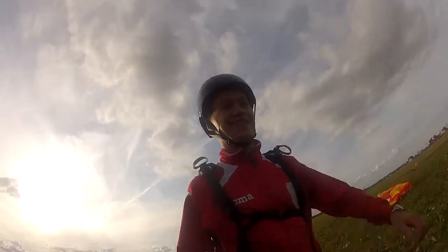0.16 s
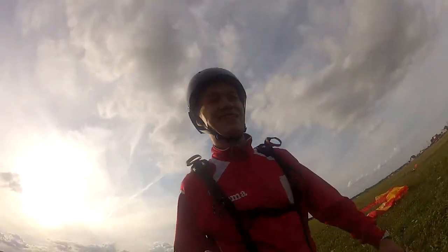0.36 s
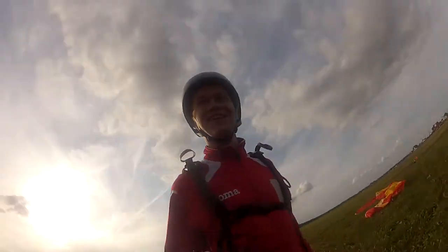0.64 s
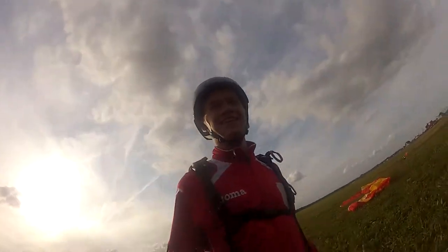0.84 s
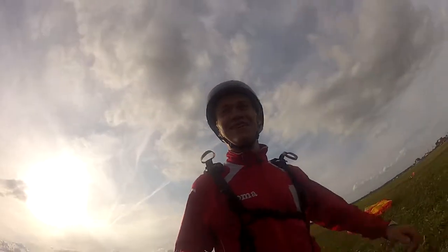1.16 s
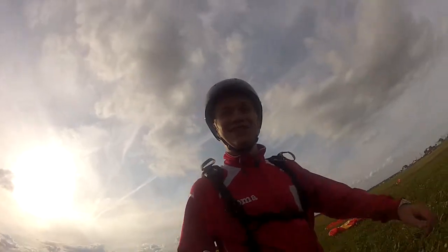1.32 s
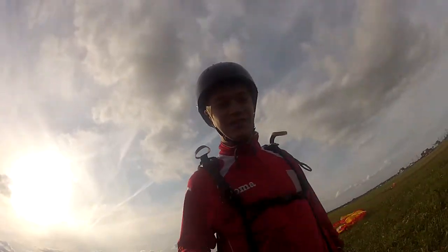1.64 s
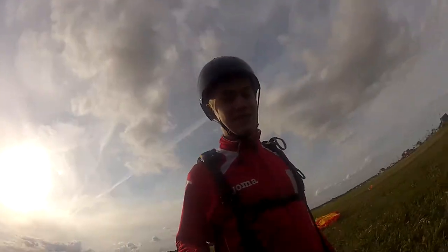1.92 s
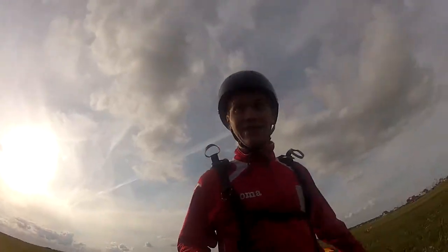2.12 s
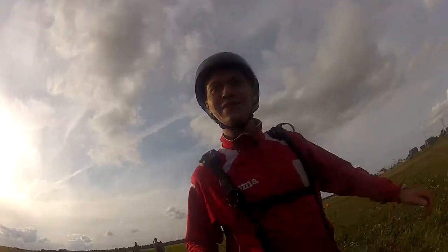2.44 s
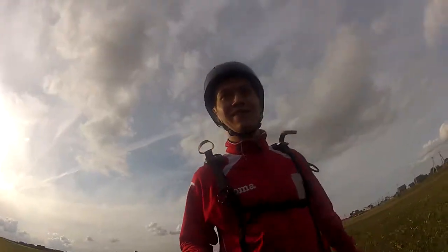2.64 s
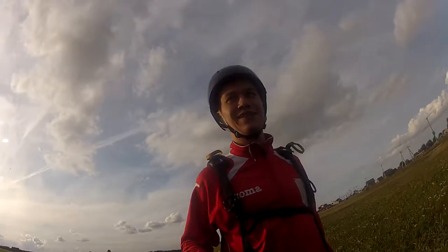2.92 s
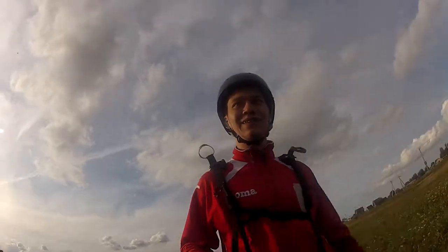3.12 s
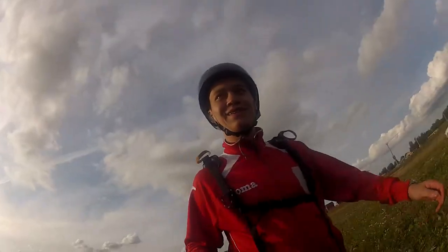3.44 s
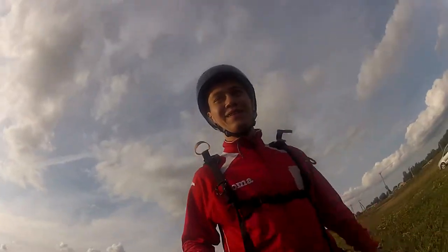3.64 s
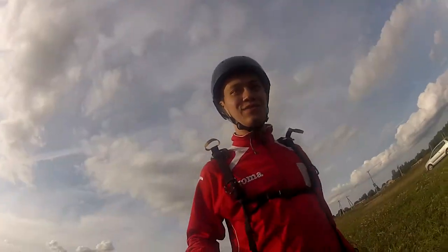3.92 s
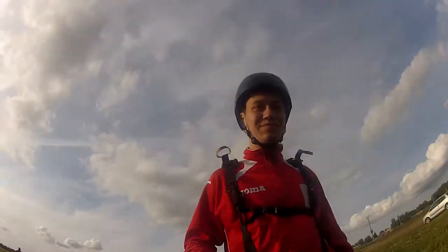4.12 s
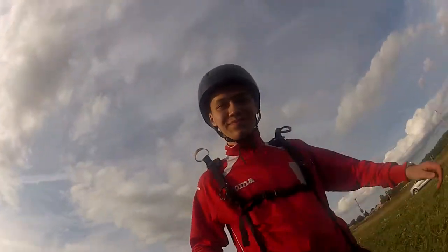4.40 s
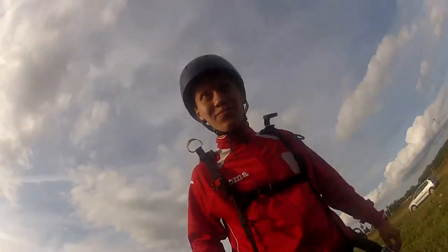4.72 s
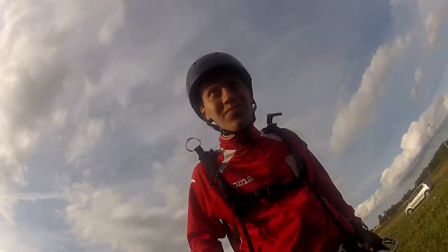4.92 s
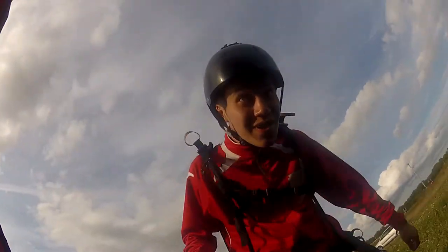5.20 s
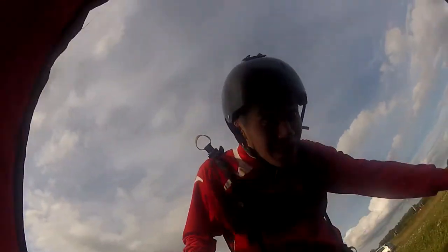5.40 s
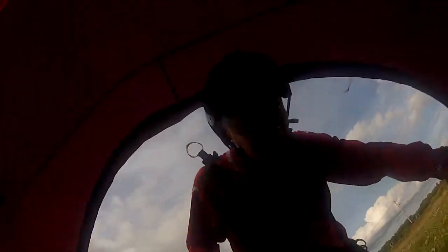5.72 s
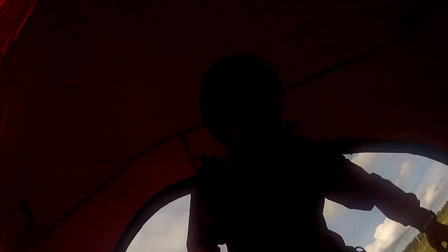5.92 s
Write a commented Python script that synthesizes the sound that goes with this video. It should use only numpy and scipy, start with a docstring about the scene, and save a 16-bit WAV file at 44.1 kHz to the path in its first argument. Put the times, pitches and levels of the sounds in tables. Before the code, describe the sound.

A nylon jacket rustles right at the microphone, with short strap tugs and a buckle tick at about 0.2 seconds. From 0.5 seconds, dull footsteps on grass thud evenly, about twice a second. They are the loudest sound, each jolting the carried camera with a low knock and a brief shudder. Between steps a sleeve swishes softly along the jacket, harness buckles tick, and the gear makes small dull bumps and scuffs. The camera mount gives a short hollow rattle at about 3.7 seconds and again at 4.7, followed by a quick cluster of sharper buckle clicks near 4.9. The last two steps, around 5.3 and 6 seconds, are much softer, while the cloth keeps swishing. A faint low rumble of air on the microphone runs underneath throughout. Everything sounds close and dry, as in an open field.

```python
"""Nylon rustles right at the microphone, then dull footfalls thud about twice a second.
A walker in a jacket and harness crosses an open grass field, carrying a small camera.
Each footfall jolts the camera: a thud and a short shudder, twice with a hollow rattle of the mount.
Between steps the cloth swishes, buckles tick and a little air rumbles on the microphone."""
import sys
import numpy as np
from scipy import signal
from scipy.fft import rfft, irfft
from scipy.io import wavfile

SR = 44100
rng = np.random.default_rng(int(sys.argv[2]) if len(sys.argv) > 2 else 0)


def waveform_to_disk(signal):
    """Save audio, clipped to [-1, 1], as 16-bit WAV at the path in sys.argv[1]."""
    frames = np.transpose(np.atleast_2d(signal))
    scaled = np.clip(frames, -1, 1) * 32767
    samples = np.round(scaled).astype(np.int16)
    wavfile.write(sys.argv[1], SR, samples)


N = 266981


def amp(db):
    """Decibels to gain."""
    return 10 ** (np.asarray(db) / 20)


def unit(x):
    """Scales to rms 1."""
    return x / np.sqrt(np.mean(x ** 2) + 1e-20)


def curve(rows):
    """A curve through (time_s, value) rows, at every sample."""
    return np.interp(np.arange(N) / SR, *np.transpose(rows))


def add(mix, start_s, sound):
    """Mixes a sound in at start_s."""
    part = mix[max(round(start_s * SR), 0):][:len(sound)]
    part += sound[:len(part)]


def colour(x, spectrum):
    """Filters x through (freq_hz, level_db) points and scales it to rms 1."""
    hz, db = np.transpose(spectrum)
    freqs = np.fft.rfftfreq(len(x), 1 / SR)
    gain = amp(np.interp(np.log(freqs + 1), np.log(hz), db))
    return unit(irfft(rfft(x) * gain, len(x)))


def noise(spectrum, size=N):
    """Noise with a given spectrum, at rms 1."""
    return colour(rng.standard_normal(size), spectrum)


def wander(rate_hz):
    """Random drift at rms 1, up to about rate_hz changes a second."""
    freqs = np.fft.rfftfreq(N, 1 / SR)
    return unit(irfft(rfft(rng.standard_normal(N)) / (1 + (freqs / rate_hz) ** 4), N))


def swing(t, hz, peak_s, sharp):
    """A heavily damped swing that builds until peak_s and dies within a few cycles."""
    age = np.maximum(t, 0) / peak_s
    return (age * np.exp(1 - age)) ** sharp * np.sin(2 * np.pi * hz * t)


def stroke(start_s, length_s, slope_db=0, rise_s=0.01, fall_s=0.019, arch_db=2):
    """Power of one rubbing stroke: it catches quickly, holds in a sloping arch and lets go."""
    t = np.arange(N) / SR - start_s
    from_middle = np.clip(t / length_s, 0, 1) - .5
    gate = np.clip(t / rise_s, 0, 1) * np.exp(-np.maximum(t - length_s, 0) / fall_s)
    return (gate * amp(slope_db * from_middle - arch_db * (2 * from_middle) ** 2)) ** 2


# Footfalls, felt through the camera body; the later levels are relative to the thud:
# start_s, level_db, pitch_hz, weight_db, knock_db, rebound_delay_s, rebound_db, shudder_db, grit_db
FOOTFALLS = [(0.4974, -7, 198.6, -5.5, 4.5, 0.0059, -10, -22, -20),
             (1.0207, -9.5, 199.4, -5.5, -12, 0.0044, -2.5, -23.5, -25),
             (1.5731, -10.5, 208, -1, -15, 0.0057, -8, -16, -20),
             (2.1109, -6.5, 199.6, -8, -1, 0.0096, -4.5, -22, -29),
             (2.6220, -6, 214, -3, -1.5, 0.008, -15, -22, -25.5),
             (3.137, -8.5, 193, -5, -2.5, 0.0059, -9.5, -19.5, -23.5),
             (3.6563, -10, 198, -0.5, 3.5, 0.00925, -13, -17, -24),
             (4.21, -9, 195, -5.5, 1, 0.0105, -10, -19.5, -25.5),
             (4.7315, -12.5, 187.6, -1.5, -7.5, 0.007, -14, -19, -20),
             (5.2770, -28, 171, 1, 2.5, 0.016, 0.5, -5.5, -15),
             (5.953, -31, 193, 3.5, -3, 0.0069, -5, -11, -30)]
# Dull shudder of the carried gear: freq_hz, level_db
SHUDDER_SPECTRUM = [(40, -8), (120, 0), (230, 1.5), (400, -1.5), (600, -0.5), (760, -13.5), (950, -34.5),
                    (2000, -30.5), (4000, -80)]
# Grit underfoot, down in the grass: freq_hz, level_db
GRIT_SPECTRUM = [(300, 9), (650, 3), (900, -10), (1300, -3), (1900, -6), (3000, -5.5), (8000, -19),
                 (15000, -19)]
# Soft bumps of the gear, close by, after and between steps: start_s, level_db, pitch_hz
GEAR_BUMPS = [(.012, -32, 243), (1.06, -29, 543), (1.087, -25, 298), (1.102, -27.5, 574),
              (1.5734, -22, 540), (1.589, -23.5, 526), (2.123, -20.5, 510), (2.167, -28, 293),
              (2.648, -28, 335), (3.146, -16.5, 480), (3.205, -33, 378), (3.527, -31.5, 450),
              (4.221, -33, 460), (5.272, -22, 406), (5.350, -33, 388)]
def footfalls():
    """The heel's jolt swings the camera; the mount knocks at the turn, rebounds and shudders."""
    out, t = np.zeros(N), np.arange(SR // 3) / SR
    for start_s, db, hz, weight_db, knock_db, delay_s, rebound_db, shudder_db, grit_db in FOOTFALLS:
        heel = amp(weight_db - 11.5) * swing(t, hz=101.4, peak_s=0.002, sharp=0.3)
        weight = amp(weight_db) * swing(t, hz=142.6, peak_s=0.0036, sharp=1.32)
        thud = swing(t, hz, peak_s=0.0056, sharp=4.54)
        knock = amp(knock_db) * swing(t - .0029, hz=405.6, peak_s=0.0023, sharp=4.96)
        rebound = amp(rebound_db) * swing(t - delay_s, hz=337, peak_s=0.0023, sharp=2.1)
        shudder_envelope = amp(shudder_db - 60 * t / 0.21) * np.minimum(t / 0.0035, 1)
        shudder = shudder_envelope * noise(SHUDDER_SPECTRUM, len(t))
        grit = amp(grit_db - 60 * t / 0.03) * noise(GRIT_SPECTRUM, len(t))
        add(out, start_s, amp(db) * (heel + weight + thud + knock + rebound + shudder + grit))
    for start_s, db, hz in GEAR_BUMPS:
        add(out, start_s, amp(db) * swing(t, hz, peak_s=0.0032, sharp=6.1))
    return out


# The mount rattling, right at the microphone: start_s, level_db, chatter_s, rasp_db (relative)
MOUNT_RATTLES = [(3.711, -23, 0.0074, -14), (4.744, -24.5, 0.028, -12)]
# Hollow modes of the mount, lowest first: pitch_hz, level_db, t60_s
MOUNT_MODES = [(601, -0.5, 0.058), (663, -11, 0.15), (950, -3, 0.017), (1160, -17, 0.049),
               (1390, -7, 0.022), (1630, -8, 0.014), (1870, -23, 0.013), (2900, -21, 0.017),
               (3570, -33, .02)]
def mount_rattles():
    """The loose mount chatters once a cycle of its lowest mode, rasps while it touches and rings on."""
    out, t = np.zeros(N), np.arange(SR // 5) / SR
    lowest_hz = MOUNT_MODES[0][0]
    impacts = np.diff(np.floor(t * lowest_hz), prepend=-1)
    ring = sum(amp(db - 60 * t / t60_s) * np.sin(2 * np.pi * hz * t) for hz, db, t60_s in MOUNT_MODES)
    for start_s, db, chatter_s, rasp_db in MOUNT_RATTLES:
        contact = np.exp(-(t / chatter_s) ** 2)
        drive = contact * (impacts + 0.12 * rng.standard_normal(len(t)))
        chatter = signal.fftconvolve(drive, ring)[:len(t)]
        add(out, start_s, amp(db) * (chatter / abs(chatter).max() + amp(rasp_db) * rasp(contact)))
    return out


# Rasp of the mount's touching parts: freq_hz, level_db
RASP_SPECTRUM = [(400, 4), (800, 5.5), (1200, -0.5), (1500, -23), (2000, 0), (2600, -11), (3600, -11),
                 (6000, -44), (10000, -13), (14000, -24)]
def rasp(contact):
    """Rough noise that lasts as long as the parts touch."""
    return contact * noise(RASP_SPECTRUM, len(contact))


# Resting rustle of the jacket, within arm's reach: time_s, level_db
JACKET_REST = [(0, -49.5), (1.6, -53.5), (2.3, -56.5), (3.6, -59), (4.8, -56), (5.4, -57), (6.05, -58.5)]
# The sleeve sweeping along the jacket, once a step: start_s, length_s, level_db, slope_db
SLEEVE_SWISHES = [(0.149, 0.26, -48.5, -11), (0.556, 0.23, -51, -8), (1.212, .24, -46, -3),
                  (1.696, 0.22, -45.5, -0.5), (2.265, .195, -49.5, -2.5), (2.676, .19, -55.5, 5),
                  (3.292, 0.23, -55, -18), (3.881, 0.11, -46.5, 7), (4.27, 0.317, -52, 2.5),
                  (4.926, .215, -49.5, -16), (5.453, .30, -49.5, -6.5)]
# Abrupt tugs of the harness on the cloth: start_s, length_s, level_db, strap_share (0-1)
HARNESS_TUGS = [(0.029, 0.0099, -37.5, .5), (0.073, 0.028, -39.5, 1), (0.22, 0.023, -39.5, 0.54),
                (0.611, 0.014, -39, 0.5), (0.654, 0.024, -45, 0.2), (1.279, 0.037, -44.5, 0),
                (1.611, 0.013, -44.5, 0.07), (2.047, 0.05, -45.5, 0.67), (2.3, 0.034, -45.5, 0),
                (3.771, 0.064, -51.5, 0.34), (4.289, 0.042, -49.5, .4), (5.439, 0.022, -53, 0.04),
                (5.586, 0.053, -46.5, .05)]
def rubbing(shake_db=-0.5, usual_strap_share=0.1):
    """Arm swings, step shakes and tugs rub the cloth; gives the level in dB and the strap's share."""
    shakes = sum(stroke(step_s - 0.048, length_s=0.11, slope_db=1) for step_s, *_ in FOOTFALLS)
    power = amp(curve(JACKET_REST)) ** 2 * (1 + amp(shake_db) ** 2 * shakes)
    for start_s, length_s, db, slope_db in SLEEVE_SWISHES:
        power += amp(db) ** 2 * stroke(start_s, length_s, slope_db)
    strap_power = usual_strap_share * power
    for start_s, length_s, db, strap_share in HARNESS_TUGS:
        tug = amp(db) ** 2 * stroke(start_s, length_s, rise_s=0.006, fall_s=0.006)
        power += tug
        strap_power += strap_share * tug
    return 10 * np.log10(power), np.clip(strap_power / power, 0, 1)


# Nylon sliding on nylon, heard close up: freq_hz, level_db
NYLON_SPECTRUM = [(530, -28), (900, -13), (1120, -11), (1200, -7.5), (1480, -12.5), (1800, -8.5),
                  (1950, -7.5), (2930, 1.5), (5060, -8.5), (5980, -11), (6730, -12.5), (8750, -7.5),
                  (11900, -36.5), (14600, -19), (15500, -10)]
# A strap drawn over the cloth: freq_hz, level_db
STRAP_SPECTRUM = [(900, -29), (2000, -11.5), (2900, -6), (3900, -6), (4900, 5.5), (5900, -9.5), (7100, 3.5),
                  (8000, -20), (8800, -9), (11000, -31), (15000, -17)]
def jacket(rub_db, strap_share, snaps_per_s=95, snap_db=5, snap_s=0.00076,
           flutter_db=1.15, folds_db=1.2, tilt_db=1.83):
    """Nylon slides on nylon or under a strap: a fine hiss, with creases that snap over."""
    snaps = (rng.random(N) < snaps_per_s / SR) * np.minimum(rng.exponential(1, N), 3)
    creases = signal.lfilter([1], [1, -np.exp(-1 / (snap_s * SR))], snaps)
    cloth = colour(rng.standard_normal(N) * (1 + amp(snap_db) * creases), NYLON_SPECTRUM)
    friction = np.sqrt(1 - strap_share) * cloth + np.sqrt(strap_share) * noise(STRAP_SPECTRUM)
    dull = signal.sosfiltfilt(signal.butter(2, 3300, fs=SR, output="sos"), friction)
    treble = friction - dull
    # faster rubbing is brighter, and the shifting folds keep changing the colour and level
    brightness = amp(tilt_db * wander(8.2) + 0.1 * (rub_db - rub_db.mean()))
    gain = amp(rub_db + flutter_db * wander(96) + folds_db * wander(19.6))
    return (dull / brightness + treble * brightness) * gain


# Buckles and straps, within arm's reach: start_s, level_db, t60_s, click_db (relative), pitch_hz
BUCKLE_TICKS = [(.227, -30.5, 0.065, -25, 1800), (.421, -39, 0.013, -19, 1800),
                (1.224, -41, 0.013, 7.5, 900), (1.534, -40.5, 0.05, -1, 700),
                (1.696, -33.5, 0.016, -10, 700), (2.314, -37, 0.014, 0, 690), (2.418, -42, 0.031, 7, 1830),
                (2.453, -31.5, 0.011, 0.5, 720), (3.002, -35, 0.011, -2, 640),
                (3.528, -52, 0.027, 3.5, 593), (3.812, -36.5, 0.023, -6, 696),
                (4.8735, -30.5, 0.011, -6, 700), (4.89, -19, 0.0054, -30, 1800),
                (4.920, -22.5, 0.015, -7.5, 744), (5.479, -43, 0.01, 8, 700), (5.628, -37, 0.034, 2.5, 650)]
# The bright part of each tick: freq_hz, level_db
TICK_SPECTRUM = [(200, -48), (1500, -24), (2200, -2.5), (2900, 7), (3200, 0), (3600, 7.5), (4200, -9.5),
                 (5000, -5), (6500, -11.5), (8300, -1), (11000, -26.5), (15500, -7.5)]
def buckles(attack_s=0.0008):
    """Small hard parts of the harness tick against each other, each with its own hollow click."""
    out, t = np.zeros(N), np.arange(SR // 10) / SR
    attack = np.sin(np.pi / 2 * np.minimum(t / attack_s, 1)) ** 2
    for start_s, db, t60_s, click_db, hz in BUCKLE_TICKS:
        hollow = [(hz / 4, -26), (hz / 3.1, -8), (hz, 0), (hz * 2, -9), (hz * 10, -30)]
        tick = noise(TICK_SPECTRUM, len(t)) + amp(click_db) * noise(hollow, len(t))
        add(out, start_s, amp(db - 60 * t / t60_s) * attack * tick)
    return out


# Dull scuffs of the gear, near the microphone: start_s, length_s, level_db, pitch_hz
GEAR_SCUFFS = [(0, 0.052, -40, 279), (1.073, 0.044, -38.5, 295), (1.143, .018, -40.5, 200),
               (2.137, 0.033, -41.5, 360), (3.173, .04, -45, 400), (4.243, 0.035, -42, 397),
               (4.463, .016, -47, 610), (5.223, 0.053, -45.5, 505)]
def gear_scuffs(resonance_db=5):
    """The gear slides a little: short, hollow rubs."""
    out = np.zeros(N)
    for start_s, length_s, db, hz in GEAR_SCUFFS:
        hollow = [(hz / 4, -10), (hz / 1.29, -3), (hz, resonance_db), (hz * 1.06, -2),
                  (1000, -24), (3000, -45)]
        out += amp(db) * np.sqrt(stroke(start_s, length_s, fall_s=0.0093)) * noise(hollow)
    return out


# Low rustle of the harness on the walker's body: freq_hz, level_db
HARNESS_SPECTRUM = [(60, 3.5), (130, -2.5), (250, 1), (400, 0.5), (600, 1.5), (780, -6.5), (1000, -19.5),
                    (2000, -14.5), (4000, -36.5)]
# That rustle between jolts: time_s, level_db
HARNESS_FLOOR = [(0, -50), (1.5, -51.5), (3, -54), (4.5, -56), (6.05, -51.5)]
def harness(rub_db, drag_db=-7, jolt_db=-49.5, settle_db_per_s=69, uneven_db=2.5):
    """The harness rustles dully, dragged along by the cloth, and settles after each step."""
    t = np.arange(N) / SR
    jolt_power = sum((t > step_s) * amp(jolt_db - settle_db_per_s * abs(t - step_s)) ** 2
                     for step_s, *_ in FOOTFALLS)
    sway = np.sqrt(amp(curve(HARNESS_FLOOR)) ** 2 + jolt_power + amp(drag_db + rub_db) ** 2)
    return noise(HARNESS_SPECTRUM) * sway * amp(uneven_db * wander(18))


# Rumble of air directly on the microphone: freq_hz, level_db
BREEZE_SPECTRUM = [(15, -35), (35, 0.5), (50, -2.5), (70, 8.5), (100, -0.5), (200, -7), (500, -79)]
# Strength of that rumble along the way across the field: time_s, level_db
BREEZE_LEVEL = [(0, -56), (1.2, -52.5), (1.7, -51), (2.4, -51), (4.5, -57), (6.05, -53.5)]
def breeze(gust_db=3.1):
    """Air buffets the microphone in light gusts."""
    return noise(BREEZE_SPECTRUM) * amp(curve(BREEZE_LEVEL) + gust_db * wander(3.3))


def scene():
    """One microphone, carried by the walker: everything is close and dry in the open field."""
    rub_db, strap_share = rubbing()
    knocks = footfalls() + mount_rattles() + buckles()
    clothing = jacket(rub_db, strap_share) + harness(rub_db)
    return (knocks + clothing + breeze() + gear_scuffs())[None]


def record(dry, mirror_hz=12000, mirror_db=2.0, notch_hz=6050, notch_q=5.55, notch_leak=0.27,
           headroom=1.65, cutoff_hz=15550):
    """The camera mirrors low sounds faintly around a high tone, dips the treble and limits the band."""
    low = signal.sosfilt(signal.butter(2, 1100, fs=SR, output="sos"), dry)
    carrier = np.cos(2 * np.pi * mirror_hz * np.arange(N) / SR)
    sizzle = amp(mirror_db) * np.gradient(low, axis=1) * carrier
    notched = signal.lfilter(*signal.iirnotch(notch_hz, notch_q, SR), dry)
    dipped = notch_leak * dry + (1 - notch_leak) * notched
    rounded = np.tanh((dipped + sizzle) / headroom) * headroom  # softly squeezes the hardest thuds
    lowpass = signal.firwin(255, cutoff_hz, window=("kaiser", 9), fs=SR)
    return signal.oaconvolve(rounded, lowpass[None], "same")


dry = scene()
out = record(dry)
waveform_to_disk(out)
```